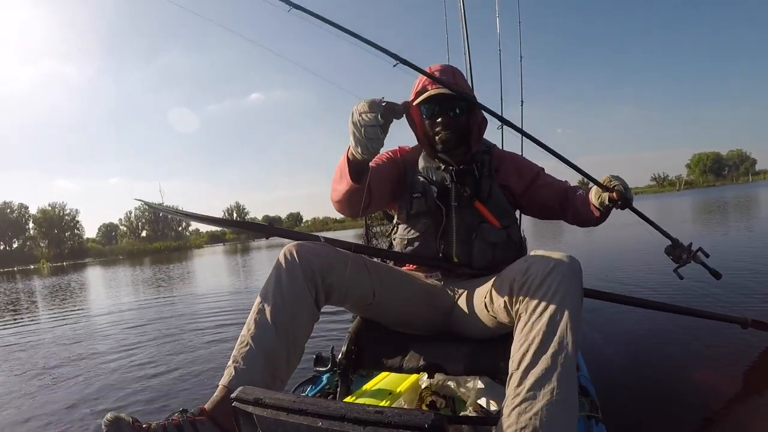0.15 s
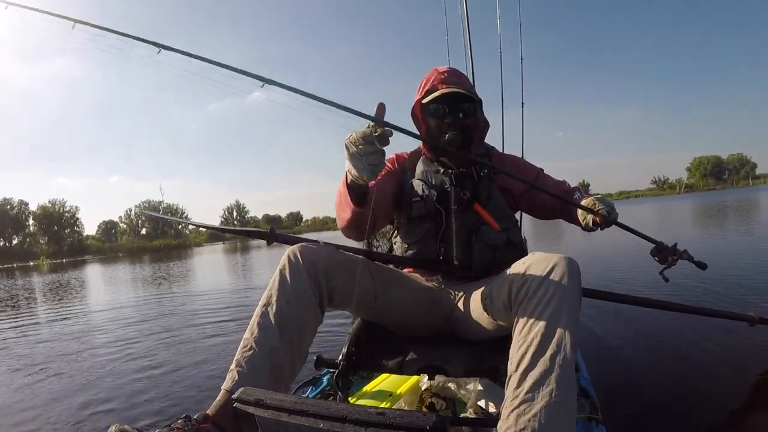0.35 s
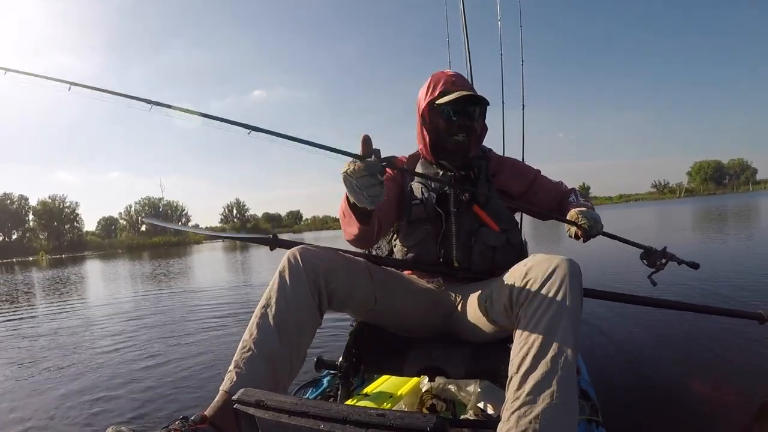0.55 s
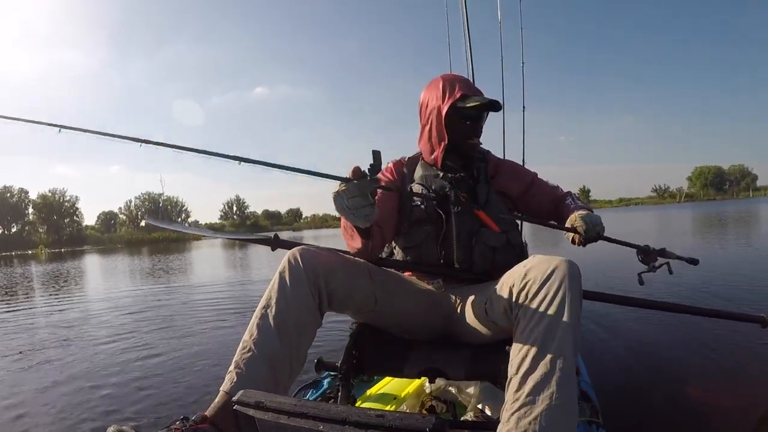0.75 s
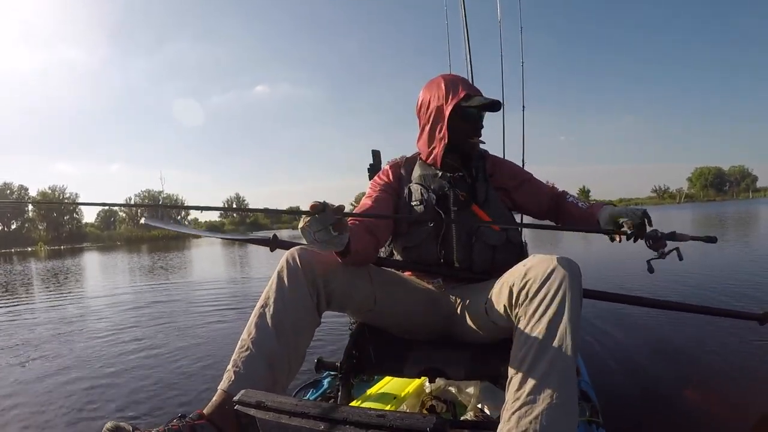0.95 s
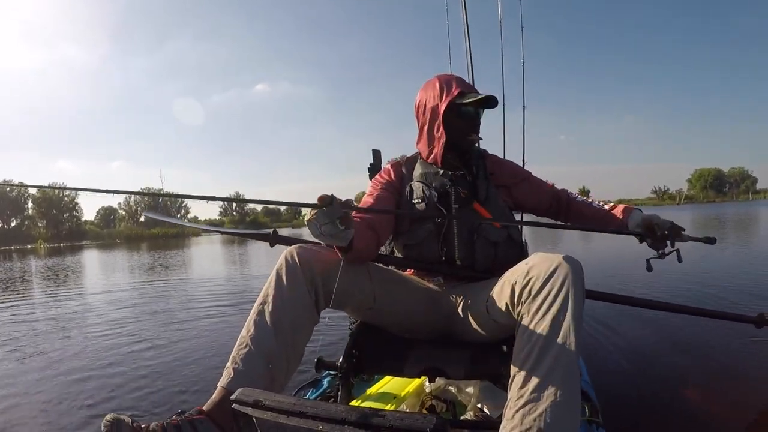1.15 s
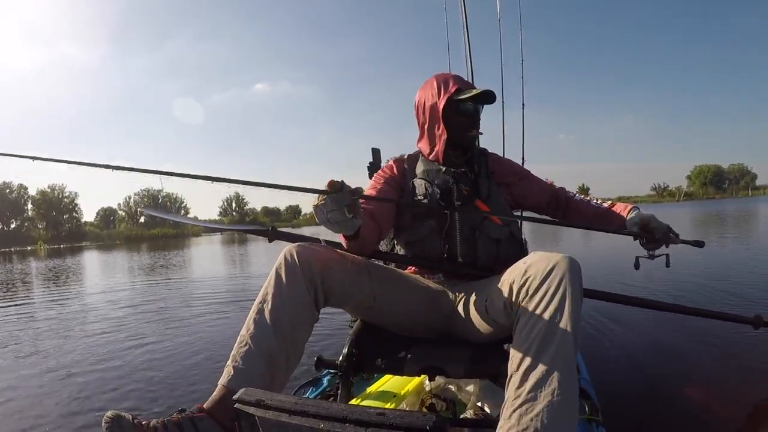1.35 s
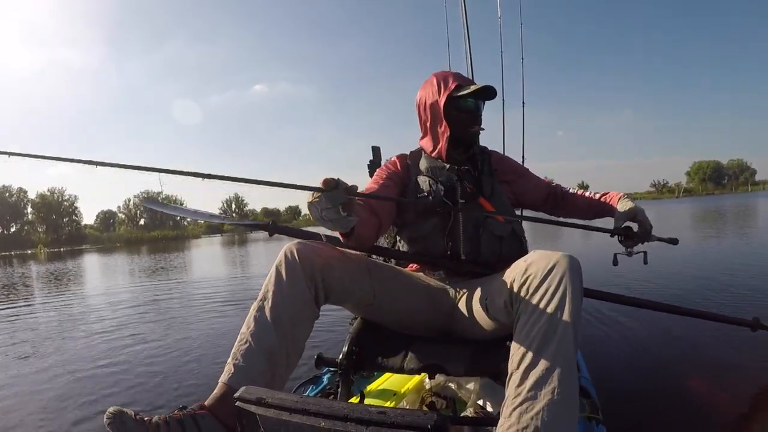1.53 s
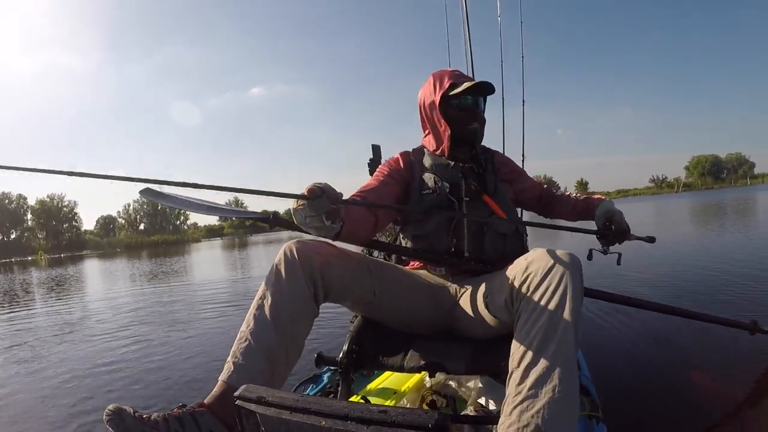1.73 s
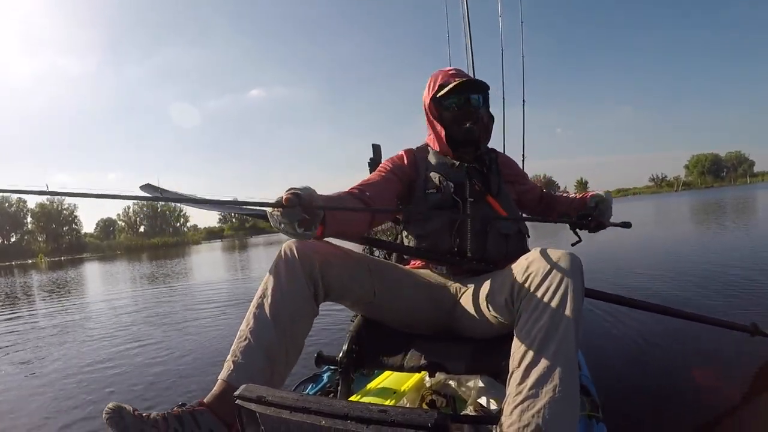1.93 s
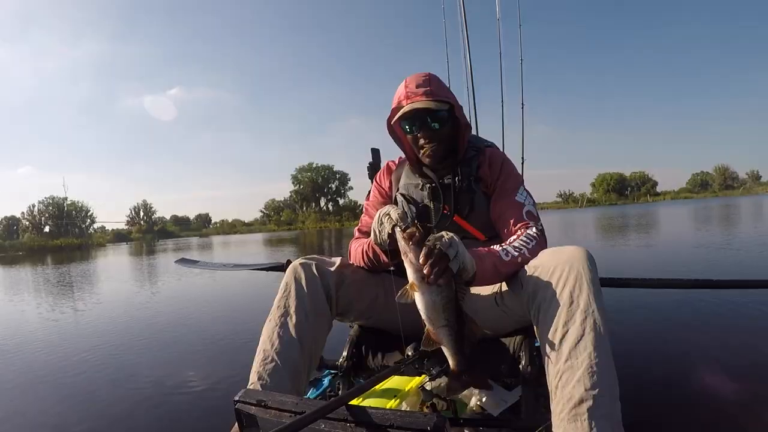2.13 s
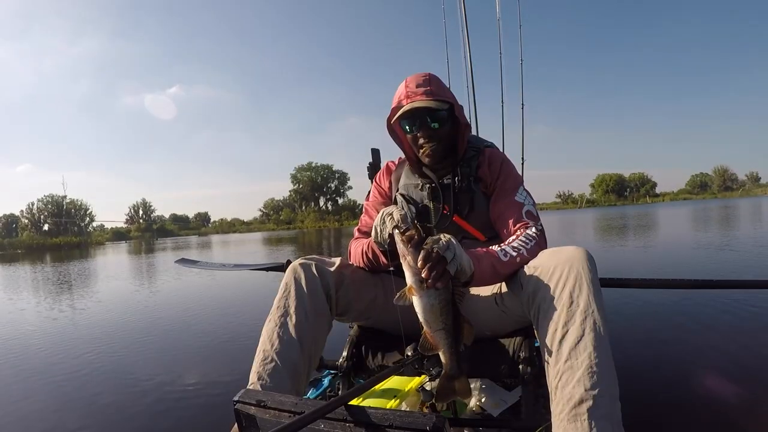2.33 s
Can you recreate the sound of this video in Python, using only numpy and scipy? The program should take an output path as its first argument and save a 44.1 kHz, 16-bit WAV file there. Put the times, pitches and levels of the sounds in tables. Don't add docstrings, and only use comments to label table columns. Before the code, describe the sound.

Hollow plastic kayak hull thumps and clatters as hard tackle bumps and scrapes, then abrupt quiet

```python
import sys
import numpy as np
from scipy import signal
from scipy.fft import rfft, irfft, next_fast_len
from scipy.io import wavfile
from scipy.ndimage import map_coordinates

SR = 44100
rng = np.random.default_rng(int(sys.argv[2]) if len(sys.argv) > 2 else 0)


def unload_wav(signal):
    wavfile.write(
        sys.argv[1],
        SR,
        np.round(np.clip(np.atleast_2d(signal).T, -1, 1) * 32767).astype(np.int16),
    )


def rack_gain(trim_db):
    fader = np.asarray(trim_db, float)
    return 10 ** (fader / 20)


N = 103635
TIME = np.arange(N) / SR

# start in seconds, knock in dB, boom in dB, deck pitch in Hz, hull pitch in Hz.
BLOWS = [(0.109, -26.5, -25.5, 546, 215), (0.243, -32, -10.5, 481, 170), (0.254, -47, -16.5, 542, 240),
         (0.375, -55.5, -28.5, 594, 122.3), (0.544, -46, -27, 710, 200), (0.565, -31, -21, 354, 200),
         (0.606, -45, -24.5, 650, 163), (0.636, -19, -10, 580, 234), (0.67, -31, -17.5, 650, 235),
         (0.711, -19.5, -12, 460, 234), (0.729, -35, -18, 390, 221), (0.806, -14, -15.5, 680, 147),
         (0.818, -20, -15, 624, 183), (0.837, -33.5, -24, 574, 119), (0.898, -32.5, -30, 620, 150),
         (1.065, -9.5, -16.5, 730, 182), (1.078, -28, -10.5, 584, 176.6), (1.108, -37, -11, 680, 141),
         (1.126, -22, -15.5, 655, 151), (1.154, -35, -12.5, 650, 149.3), (1.169, -25.5, -10, 660, 225),
         (1.181, -20, -27, 750, 245), (1.196, -56, -18.5, 600, 147), (1.239, -20.5, -24, 593, 249),
         (1.267, -59, -19.5, 606, 125), (1.347, -37.5, -19.5, 740, 108), (1.368, -21, -15, 757, 105.6),
         (1.545, -45, -38, 400, 195), (1.625, -24, -39, 540, 250), (1.775, -15.5, -14.5, 319, 248),
         (1.785, -25.5, -15, 318, 236), (1.867, -28.5, -25.5, 517, 126), (1.885, -30.5, -33, 460, 132),
         (2.026, -27.5, -48, 400, 250), (2.043, -23.5, -34.5, 540, 252), (2.074, -27.5, -34, 820, 120)]
# start in seconds, peak in dB, centre in Hz, length in seconds.
TACKLE_TICKS = [(0.103, -46, 1210, 0.0036), (0.238, -44.5, 6300, 0.005), (0.542, -50, 2400, 0.004),
                (0.546, -41.5, 1320, 0.011), (0.578, -46, 5270, 0.03), (0.633, -30.5, 3860, 0.0086),
                (0.664, -46, 4470, 0.0049), (0.699, -28, 5300, 0.025), (0.752, -38, 2500, 0.0048),
                (0.789, -41, 1390, 0.01), (0.795, -35, 4730, 0.019), (0.813, -18, 4530, 0.012),
                (0.889, -43.5, 3100, 0.045), (1.038, -36.5, 5550, 0.012), (1.06, -18, 5400, 0.0075),
                (1.072, -25.5, 6270, 0.0026), (1.109, -36.5, 5760, 0.023), (1.125, -24, 5570, 0.0063),
                (1.149, -35, 4700, 0.031), (1.164, -43, 7400, 0.0036), (1.181, -31, 6800, .004),
                (1.211, -53, 6500, 0.0017), (1.235, -34.5, 4820, 0.0063), (1.337, -43.5, 5600, 0.024),
                (1.363, -26.5, 4300, 0.0035), (1.527, -49.5, 4500, 0.041), (1.628, -29, 2315, 0.0074),
                (1.642, -26.5, 3000, 0.0032), (1.651, -37.5, 3900, 0.015), (1.696, -63, 5170, 0.0024),
                (1.746, -40, 3200, 0.0039), (1.772, -21, 2710, 0.0071), (1.866, -29, 2000, 0.0048),
                (2.029, -42, 1500, .005), (2.035, -27.5, 3700, 0.022), (2.046, -21, 3470, 0.0067),
                (2.064, -30, 3860, 0.019)]
# time in seconds, pressure in dB, scuffing in dB, deck rattle in dB.
DRAG_MOVES = [(0, -38, -81.5, -48.5), (0.218, -43, -63, -53), (0.296, -24, -58.5, -27),
              (0.419, -43, -69, -71), (0.529, -41, -56, -55), (.62, -35, -45, -27),
              (.78, -20.5, -47.5, -34), (0.919, -28.5, -59.5, -33.5), (1.018, -44.5, -52, -54),
              (1.116, -23, -36.5, -14), (1.249, -21.5, -65, -33.5), (1.42, -23.5, -61, -41),
              (1.501, -44.5, -60, -51.5), (1.603, -37, -47.5, -41), (1.741, -38, -55.5, -48),
              (1.82, -29.5, -41.5, -43.5), (1.954, -47, -59.5, -57), (2.101, -42, -31, -42)]
# time in seconds, level in dB.
SWAY_LEVEL = [(0, -32.5), (.24, -59.5), (.32, -32.5), (.78, -35), (.86, -19), (1.05, -26.5), (1.3, -22.5),
              (1.4, -19), (1.55, -35), (1.75, -43), (1.92, -30), (2.0, -30.5), (2.07, -28.5)]
# pitch in Hz, 60 dB decay in seconds, level in dB.
HULL_MODES = [(101.8, 0.63, -11.5), (124.6, 0.29, 1), (162.3, 0.22, -3), (204.2, 0.15, -5.5),
              (248.6, 0.12, -2.5)]
# pitch in Hz, level in dB.
DECK_TONE = [(270, 1.5), (400, 2), (500, -3.5), (620, 8), (760, 6), (920, -13.5), (1200, -41.5),
             (2400, -26)]
# pitch in Hz, 60 dB decay in seconds.
DECK_DECAY = [(270, 0.21), (600, .1), (2400, 0.076)]
# start in seconds, end in seconds, pitch in Hz, level in dB.
STICK_SLIP = (.268, .354, 124, -17)
# start in seconds, pitch in Hz, level in dB, 60 dB decay in seconds.
GUIDE_SNAP = (1.064, 6450, -10, .014)
# start in seconds, pitch in Hz, level in dB, 60 dB decay in seconds.
METAL_PING = (.296, 1235, -49, .22)
# frequency in Hz, level in dB.
MOUNT_TONE = [(24, -16), (33, -3), (41, 0), (50, -9), (70, -15), (110, -30), (200, -120)]
# frequency in Hz, level in dB.
SCUFF_TONE = [(500, 28.5), (1200, 18.5), (3500, -0.5), (6500, 6.5), (9000, -16.5), (11500, -16.5),
              (13000, -53)]
# start in seconds, end in seconds, first Hz, last Hz, notes a second,
# level in dB, fade in dB.
BIRD_TRILLS = [
    (.825, 1.08, 5700, 5900, 123, -52.5, 2),
    (1.06, 1.38, 5850, 5700, 123, -59, -3),
    (1.412, 1.6, 5000, 4300, 108, -55.5, -16),
]
# frequency in Hz, level in dB per Hz.
AIR_TONE = [(450, -4.5), (725, -0.5), (1150, -12), (2000, -14), (4100, -21.5), (9000, -21), (12500, -27.5),
            (14000, -62.5)]
# frequency in Hz, level in dB per Hz.
LAKE_TONE = [(53, -50), (95, -36), (135, 2.5), (269, 0), (650, -7.5), (860, -7), (1470, -16), (9540, -28),
             (15300, -34.5)]
# frequency in Hz, lead in radians.
PORT_LEAD = [(30, -.2), (140, -.7), (210, -1.6), (350, -3), (900, -3.55), (1150, -3.7), (1600, -5.6),
             (2600, -2 * np.pi)]
# frequency in Hz, difference in dB.
PORT_TILT = [(30, -5), (90, -6), (230, -20), (400, -11), (900, -0.5), (1900, -8.5), (5500, -0.5),
             (12000, -4)]
# frequency in Hz, share from 0 to 1.
PORT_APART = [(30, 0.79), (220, 0.51), (400, 0.33), (600, 0.035), (900, 0.26), (1300, 0.54), (4000, 0.29),
              (10000, 1)]
# frequency in Hz, ratio in dB.
FAR_SIDE = [(90, -4.5), (200, -3.5), (400, 8), (800, 9), (1200, 2), (2000, 7), (4000, 1), (12000, -1.5)]
# time in seconds, side gain in dB.
STEREO_FOLD = [
    (1.42, -2),
    (1.65, -13.5),
    (1.79, -15),
    (1.89, -14.5),
    (1.96, -25),
    (2.05, -21),
]

DETUNE = 0.054
BOOM_DB, KNOCK_DB, TICK_DB, DRAG_DB, AIR_DB, LAKE_DB = -2.5, 11.5, -2, -2, -59.5, -48
CONTACT_S, SHARP = 0.0088, .9
HULL_FOCUS_DB, DECK_FOCUS_DB = 11, 11
TICK_WIDTH, TICK_TAIL_DB, TICK_TAIL_S = 0.57, -26.5, 0.21
DRAG_DULL_HZ, KNOCK_DULL_HZ, TICK_TOP_HZ = 650, 2000, 9860
CHIRP, ROUGH, GAP_DEPTH = .12, .7, .92
LOWER, LOWER_DB = .72, -8
FADE_S, CUT_S, CUT_FADE_S = .02, 2.092, .012
BASS_HZ, BASS_FOLD = 200, 0.55
SPILL = 0.2


def unit(x):
    return x / np.sqrt(np.mean(x ** 2) + 1e-20)


def along(points, hz):
    f, v = np.transpose(points)
    return np.interp(np.log(hz + 1), np.log(f + 1), v)


def curve(rows):
    return np.interp(TIME, *np.transpose(rows))


def wobble(rate):
    knots = rng.standard_normal(int(N * rate / SR) + 4)
    return map_coordinates(knots, [TIME * rate])


def filtered(x, response):
    m = next_fast_len(x.shape[-1] + SR // 2)
    spectrum = rfft(x, m) * response(np.fft.rfftfreq(m, 1 / SR))
    return irfft(spectrum, m)[..., :x.shape[-1]]


def hiss(spectrum):
    points = [(0.61, -120)] + spectrum
    return unit(filtered(rng.standard_normal((2, N)), lambda hz: rack_gain(along(points, hz))))


def ring(modes, t, focus_hz=200, focus_db=0):
    hz, t60, db = np.transpose(modes)[..., None]
    uneven, retune = rng.standard_normal((2,) + hz.shape)
    db = db - focus_db * np.log2(hz / focus_hz) ** 2
    tone = np.sin(2 * np.pi * hz * (1 + DETUNE * retune) * t)
    return (rack_gain(db + 3 * uneven - 60 * t / t60) * tone).sum(0)


def deck():
    hz = np.geomspace(DECK_TONE[0][0], DECK_TONE[-1][0], num=60)
    return np.transpose([hz, along(DECK_DECAY, hz), along(DECK_TONE, hz)])


def lumps(rate):
    return rng.standard_normal((2, N)) * rack_gain(3.5 * wobble(rate))


def drag():
    s, press_db, scuff_db, rattle_db = np.transpose(DRAG_MOVES)
    t = np.arange(SR // 2) / SR
    rumble, rattle = (unit(signal.fftconvolve(lumps(35.47), ring(modes, t)[None], axes=1)[:, :N])
                      for modes in (HULL_MODES, deck()))
    rattle = unit(filtered(rattle, lambda hz: 1 / (1 + (hz / DRAG_DULL_HZ) ** 2)))
    grit_db = 2.5 * wobble(45) + 2 * wobble(300)
    scuff = rack_gain(np.interp(TIME, s, scuff_db) + grit_db) * hiss(SCUFF_TONE)
    rumble = rack_gain(np.interp(TIME, s, press_db) + DRAG_DB) * rumble
    return rumble + scuff + rack_gain(np.interp(TIME, s, rattle_db)) * rattle


def sway():
    return rack_gain(curve(SWAY_LEVEL)) * hiss(MOUNT_TONE)


def far(spectrum):
    def spread(hz):
        mid_share = 1 / (1 + rack_gain(2 * along(FAR_SIDE, hz)))
        return np.sqrt([mid_share, 1 - mid_share])
    mid, side = filtered(hiss(spectrum), spread)
    return np.array([mid + side, mid - side])


def air():
    return rack_gain(AIR_DB + wobble(8.54)) * far(AIR_TONE)


def ticks():
    out, t = np.zeros((2, N + SR)), np.arange(SR // 8) / SR
    for s, db, centre, length in TACKLE_TICKS:
        u = t / max(length, .001)
        scatter = rack_gain(TICK_TAIL_DB - 60 * t / TICK_TAIL_S) * np.minimum(u, 1)
        shape = 1.305 * u * np.exp(-2 * u ** 2) + scatter
        noise = rng.standard_normal((2, len(t)))
        grains = rng.standard_normal(len(t) // 24 + 1).repeat(24)[:len(t)]

        def colour(hz):
            peak = 0.54 + np.exp(-(np.log((hz + 1) / centre) / TICK_WIDTH) ** 2)
            low_cut = (hz / (hz + 1200)) ** 2
            return peak * low_cut / (1 + (hz / centre / 2) ** 2) / (1 + (hz / TICK_TOP_HZ) ** 10)
        burst = unit(filtered(noise * rack_gain(4.2 * grains), colour))
        out[:, round(s * SR):][:, :len(t)] += rack_gain(db + TICK_DB) * burst * shape
    return out[:, :N]


def knocks():
    out, t = np.zeros((2, N + SR)), np.arange(SR // 2) / SR
    u = t[:SR // 16] / CONTACT_S
    for s, knock_db, boom_db, deck_hz, hull_hz in BLOWS:
        for row in out:
            push = rng.standard_normal(len(u)) * u * np.exp(-3 * u)
            push[0] = SHARP
            boom = signal.fftconvolve(push, ring(HULL_MODES, t, hull_hz, HULL_FOCUS_DB))[:len(t)]
            knock = signal.fftconvolve(push, ring(deck(), t, deck_hz, DECK_FOCUS_DB))[:len(t)]
            boom = rack_gain(boom_db + BOOM_DB) * boom / np.std(boom[:SR // 40])
            knock = rack_gain(knock_db + KNOCK_DB) * knock / abs(knock).max()
            row[round(s * SR):][:len(t)] += boom + knock
    return filtered(out[:, :N], lambda hz: (1j * hz / (70 + 1j * hz) / (1 + 1j * hz / KNOCK_DULL_HZ)) ** 2)


def stick_slip():
    t0, t1, hz, db = STICK_SLIP
    on = np.clip(np.minimum(TIME - t0, t1 - TIME) / 0.003, 0, 1)
    level = rack_gain(db + 2 * wobble(40)) * on
    turn = 2 * np.pi * np.cumsum(hz * (1 + .04 * wobble(30))) / SR
    return level * np.sin(turn) * [[1.4], [.4]]


def pings():
    out = np.zeros((2, N))
    for s, hz, db, t60 in (METAL_PING, GUIDE_SNAP):
        t = np.clip(TIME - s, 0, None)
        onset = 1 - np.exp(-t * 30 / t60)
        out[0] += rack_gain(db - 60 * t / t60) * np.sin(2 * np.pi * hz * t) * onset
    return out


def bird():
    out = np.zeros(N)
    for t0, t1, hz0, hz1, rate, db, fade_db in BIRD_TRILLS:
        cycle = (rate * TIME + 0.053 * wobble(30.15)) % 1
        hz = np.interp(TIME, [t0, t1], [hz0, hz1]) * (1 + CHIRP * (.5 - cycle))
        turn = 2 * np.pi * np.cumsum(hz) / SR
        voice = np.sin(turn + ROUGH * wobble(2500))
        voice += rack_gain(LOWER_DB) * np.sin(LOWER * turn + 3.0 * wobble(770))
        on = np.clip(np.minimum(TIME - t0, t1 - TIME) / FADE_S, 0, 1)
        notes = 1 - GAP_DEPTH * np.cos(np.pi * cycle) ** 2
        fade = np.interp(TIME, [(t0 + t1) / 2, t1], [0, fade_db])
        out += rack_gain(db + fade + 1.7 * wobble(22.0)) * 2.03 * on * notes * voice
    return out * [[1], [.8]]


def lake():
    return rack_gain(LAKE_DB + 0.56 * wobble(8.64)) * far(LAKE_TONE)


def ports(pair):
    def response(hz):
        half = rack_gain(along(PORT_TILT, hz) / 2) * np.exp(.5j * along(PORT_LEAD, hz))
        return 2 * np.array([half, 1 / half]) / (abs(half) + 1 / abs(half))
    other = filtered(pair[1], lambda hz: along(PORT_APART, hz))
    return filtered(np.array([pair[0] + other, pair[0] - other]), response)


def fold(stereo):
    left, right = stereo
    mid, side = (left + right) / 2, (left - right) / 2
    bass = filtered(side, lambda hz: 1 / (1 + (hz / BASS_HZ) ** 4))
    width_db = curve(STEREO_FOLD)
    mid = mid - SPILL * (1 - rack_gain(width_db)) * (side - bass)
    side = rack_gain(width_db) * (side - bass) + rack_gain(BASS_FOLD * width_db) * bass
    return np.array([mid + side, mid - side])


def scene():
    before = np.clip((CUT_S - TIME) / CUT_FADE_S, 0, 1)
    kayak = knocks() + ticks() + pings() + drag() + stick_slip() + sway() + bird()
    return before * fold(ports(kayak) + air()) + (1 - before) * lake()


def roll_off(x):
    return signal.sosfilt(signal.butter(12, 15460, fs=SR, output="sos"), x)


def record(dry):
    held = dry / (1 + abs(dry / .96) ** 4) ** .25
    return roll_off(held)


dry = scene()
out = record(dry)
unload_wav(out)
```